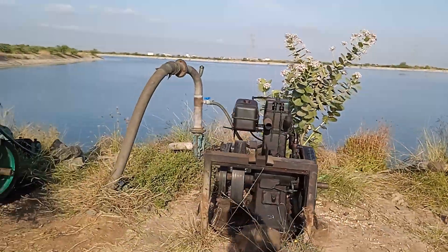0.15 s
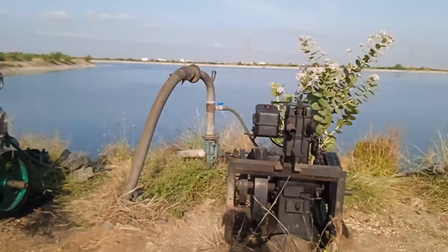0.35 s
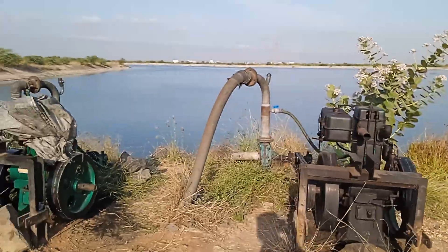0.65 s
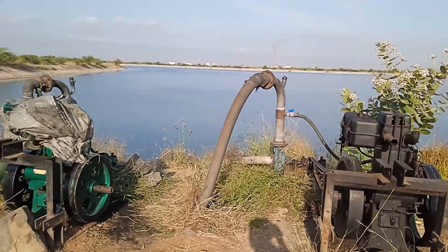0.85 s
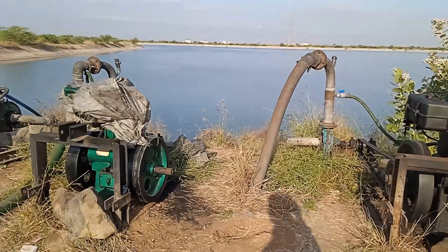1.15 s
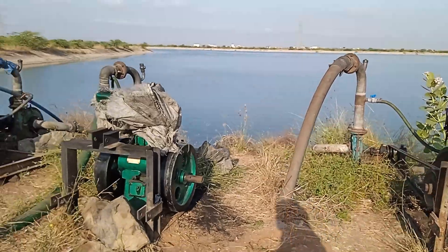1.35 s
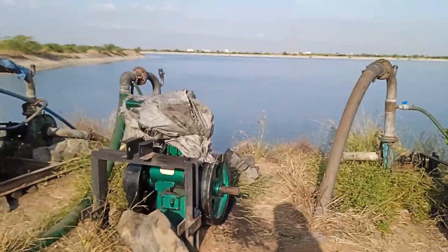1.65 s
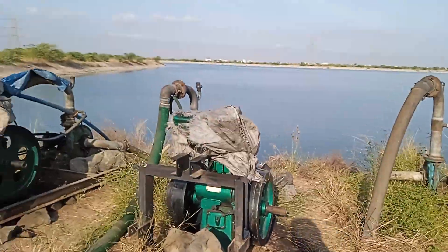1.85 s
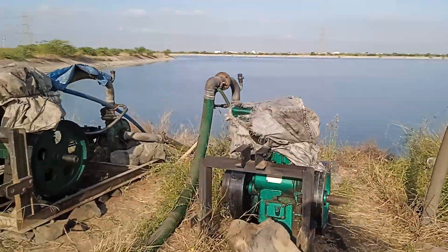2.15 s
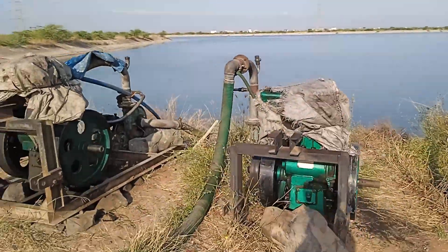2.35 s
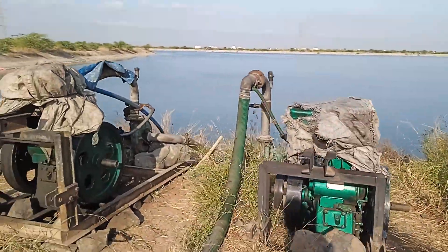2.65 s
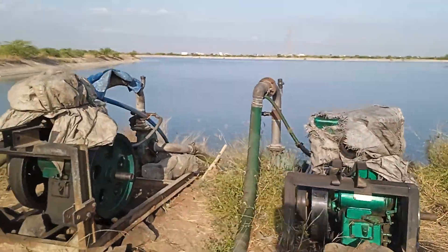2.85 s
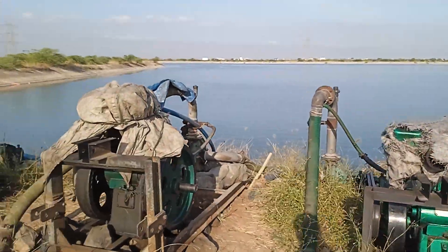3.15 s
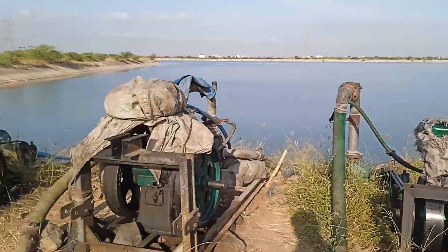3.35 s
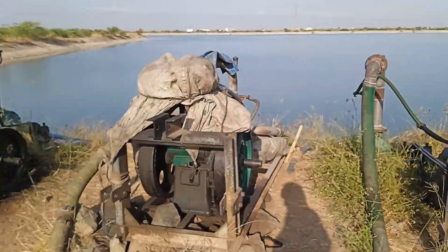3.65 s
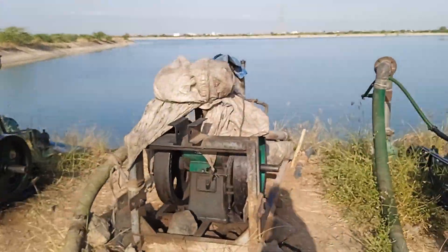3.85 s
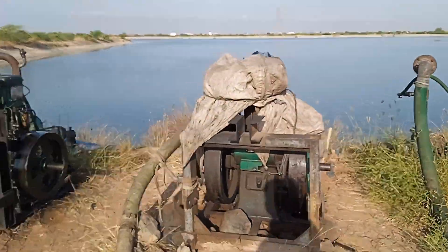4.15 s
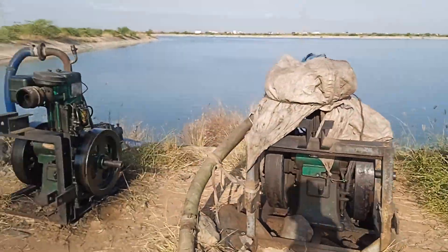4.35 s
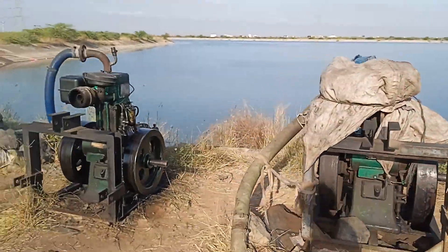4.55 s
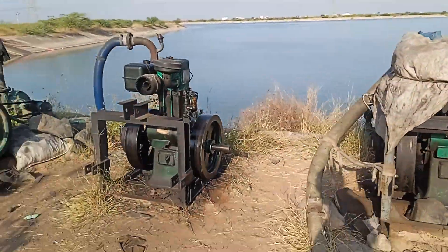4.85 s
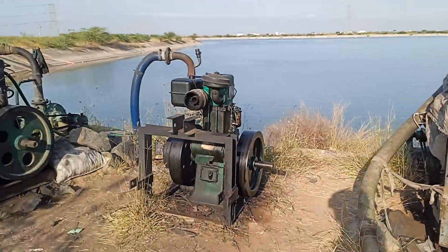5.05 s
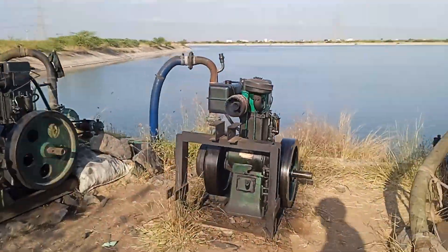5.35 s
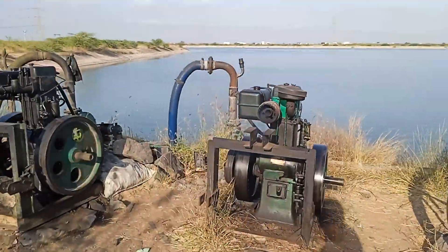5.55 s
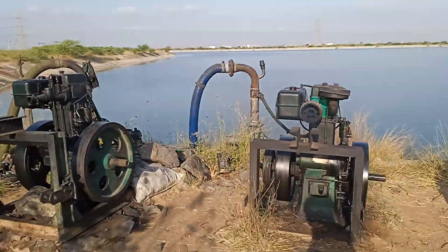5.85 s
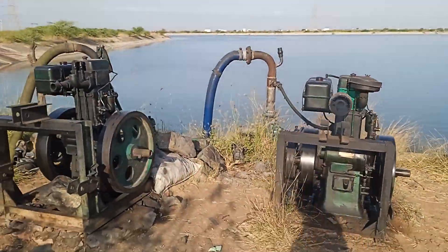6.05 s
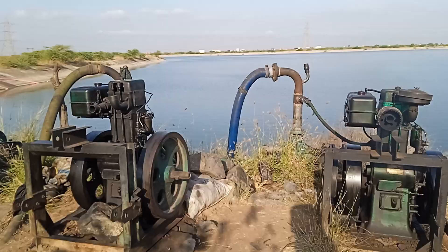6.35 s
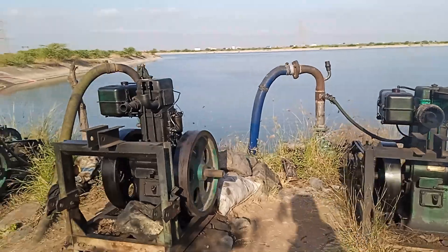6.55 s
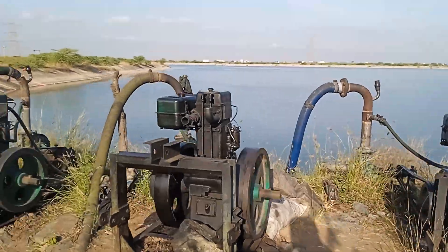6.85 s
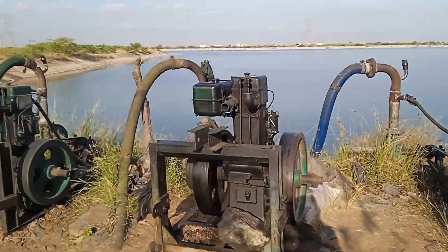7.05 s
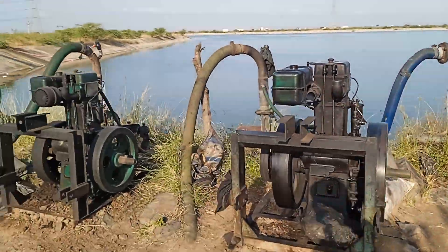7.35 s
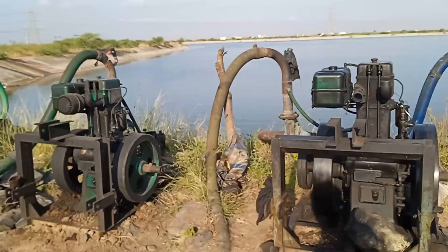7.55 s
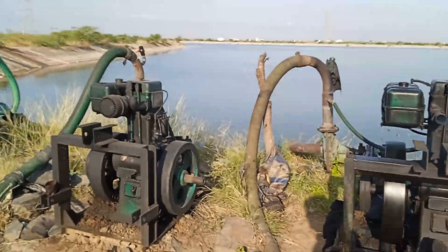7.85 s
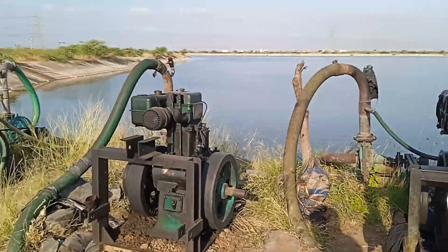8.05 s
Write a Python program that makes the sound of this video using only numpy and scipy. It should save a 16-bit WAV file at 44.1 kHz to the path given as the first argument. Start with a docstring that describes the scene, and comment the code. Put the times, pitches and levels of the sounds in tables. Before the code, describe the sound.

From 0 s three slow single-cylinder diesels are already running, at about 4.3, 3.5 and 3.8 firings a second, their beats drifting together and apart into an uneven gallop. The quickest gives bright, hissing gas barks with a short rising low boom; the slowest has a hollow bark and hard iron knock, its knocking clearer after about 4 s; the third starts more distant, a sharp pop followed by gas. Pipe thumps, intake gulps and small metallic ticks fill in. Carried along the row outdoors, the close microphone changes the balance: the fast engine's hiss is fullest around 5 s, the slow one's knock and the third's pop around 6 to 7 s. A soft low bump falls at 6.3 s. After 7 s the fast bark weakens while the hollow one stays strong. Rumble, frame drone, gear clatter and churning pumps continue behind, with water rush strongest at the end, around 8 s, engines still running.

```python
"""Three slow single-cylinder diesels drive pumps on a canal bank. They run from the start, each at its own speed,
so their beats drift through one another. Each firing thumps in the pipe as a burst of gas barks and hisses;
the fast and slow engines add a rising silencer boom, an intake gulp and a combustion knock, and valves tick.
The microphone is carried along the row, so each part changes level in turn, and at 6.3 s there is a soft low bump.
Gears, frames and pumped water sound behind it all, and the rush of water is strongest at the end."""
import sys
import numpy as np
from scipy import signal
from scipy.fft import rfft, irfft, next_fast_len
from scipy.io import wavfile

SR = 44100
rng = np.random.default_rng(int(sys.argv[2]) if len(sys.argv) > 2 else 0)


def materialize(psi):
    """Save the field psi as 16-bit PCM at rate SR to the path in sys.argv[1].

    A 1-D psi becomes a single channel; in a 2-D psi each row is a channel.
    """
    bounded = np.clip(np.atleast_2d(psi).T, -1, 1)
    quanta = np.round(bounded * 32767).astype(np.int16)
    wavfile.write(sys.argv[1], SR, quanta)


N = 362061
TIME = np.arange(N) / SR

# colour of an iron block struck by combustion: f/Hz, level/dB
BLOCK_COLOUR = [(200, -25), (330, -15.5), (420, 4.5), (550, -6.5), (750, -9.5), (950, -3), (1130, 0),
                (1450, -6.5), (1800, -8), (2600, -27), (4000, -22), (6500, -16), (9000, -31), (13000, -46)]
# colour of the air gulped through an intake: f/Hz, level/dB
INTAKE_COLOUR = [(150, -20), (280, -4.5), (345, 9.5), (440, 0.5), (560, -19.5), (1000, -2.5), (1500, -12),
                 (2800, -16.5), (4400, -16), (7000, -18.5), (10000, -31), (15000, -51)]


def fast_engine():
    """About 4.3 firings a second, with a bright gas bark and a deep silencer boom."""
    # pace, one row: first firing t/s, cycle length/s, lengthening per cycle/s
    pace = (.0101, .23216, .0000936)
    # rows: gas hiss, bark, pipe thump, silencer boom, intake, combustion knock, sizzle
    # columns: far level/dB, close level/dB, closest t/s, half-length of the pass/s, scatter between firings/dB
    parts = [(-29, -14, 5.14, 4.04, 1.9), (-21.5, -22.5, 4.3, -1.5, 0), (-34.5, -18, 5.86, 4.3, .9),
             (-28.5, -32.5, 3.5, 4.5, 1.0), (-44.5, -29.5, 6.2, 4.36, 2.7), (-42, -35.5, 6.5, 2.2, 1.5),
             (-27, -57, 3.1, 1.7, 1)]
    # bark of the can and hiss of the jet: f/Hz, level at the start of the row/dB, level at its end/dB
    bark_colour = [(390, -5.5, -20), (630, -3.5, -8), (930, -29, -11.5), (983, 1, -3.5), (1090, 0.5, 4),
                   (1360, -2, -1.5), (1750, -5, 0), (1770, -1, -3.5), (1930, 1, -10), (2320, -9, -53),
                   (2730, -3.5, 7.5), (3200, -16.5, -5)]
    hiss_colour = [(2360, -9, -17), (3070, -48, -4.5), (3510, -17, -12), (4044, 6.5, -12), (4340, 3, 7),
                   (4900, 3, -8.5), (5940, 2, -5), (5950, 2, 4), (7420, 5.5, -7.5), (9030, 1.5, -22.5),
                   (10700, -12.5, -14.5), (12000, -10, -35), (13300, -28, -30), (15300, -11, -21)]
    # the bark grows weaker late in the row as its colour turns: edge t/s, change before it/dB, change after it/dB
    bark_step = (6.9, 0, -8.5)
    # finest spray of the gas jet: f/Hz, level/dB
    sizzle_colour = [(8000, -10), (10000, 3), (12200, -6), (13500, -6), (15300, 0), (16500, -8)]

    s, hiss_db, bark_db, thump_db, boom_db, intake_db, knock_db, sizzle_db = run_engine(pace, parts)
    bark_db = bark_db + level_step(s, *bark_step)
    valve = puff(rise=0.0049, fall=0.004, tail_db=-19.0, tail_s=0.027, lead=0.00785)
    gas = exhaust(s, hiss_db, bark_db, bark_colour, hiss_colour, valve, rough_db=1.0)
    # the sizzle beams to the sides, so it is weakest close by
    spray = puff(rise=0.0086, fall=0.0037, tail_db=-20, tail_s=.01, lead=0.01)
    gas += cycles(s, sizzle_db, spray) * turbulence(sizzle_colour, rough_db=2.0)

    # the lower pipe mode is screened at the start of the row and opens up on the way
    screened_db = -10 * np.exp(-s / 6.4)
    pipe = cycles(s, thump_db + screened_db, ring(hz=402.4, rise=0.0074, decay=0.0036, lead=0.01153))
    pipe += cycles(s, thump_db - 6.5, ring(hz=517, rise=0.0035, decay=0.0049, lead=0.01081))
    # a third mode beams towards the end of the row, gaining 3 dB a second
    beam_db = -7.5 - 3 * (TIME[-1] - s)
    pipe += cycles(s, thump_db + beam_db, ring(hz=627, rise=0.0052, decay=0.0063, lead=.011))

    silencer = boom(start_hz=64, end_hz=187, glide_s=0.025, delay=0.00695, rise=0.009, decay=0.016)
    low = cycles(s, boom_db, silencer)
    gulp = puff(rise=0.013, fall=0.011, tail_db=-7.5, tail_s=0.045)
    intake = cycles(s + 0.075, intake_db, gulp) * turbulence(INTAKE_COLOUR, rough_db=0)
    # combustion comes before the exhaust valve opens
    blow = puff(rise=0.0024, fall=0.012, tail_db=-16, tail_s=0.019)
    knock = cycles(s - .052, knock_db, blow) * turbulence(BLOCK_COLOUR, rough_db=0)
    ticks = valve_gear(s - .052, hiss_db - 19.5, rise=0.0064, fall=0.0074)
    ticks += valve_gear(s + 0.122, hiss_db - 26, rise=0.004, fall=.004)
    return gas + pipe + low + intake + sheet_metal(knock + ticks, ring_db=-2.0, decay=0.012)


def slow_engine():
    """About 3.5 firings a second, with a hollow gas bark and a hard combustion knock."""
    # pace, one row: first firing t/s, cycle length/s, lengthening per cycle/s
    pace = (.1077, .28829, .000078)
    # rows: gas hiss, bark, pipe thump, silencer boom, intake, combustion knock
    # columns: far level/dB, close level/dB, closest t/s, half-length of the pass/s, scatter between firings/dB
    parts = [(-23.5, -16, 6.5, 2.14, 0.47), (-21, -21.5, 7.9, 2.2, 1.3), (-37.5, -26, 7.3, 0.89, 0.73),
             (-37.2, -34.5, 5.0, 4, 0.78), (-50.5, -28, 6.25, 3.1, 1.6), (-27.5, -24, 6.5, 1.7, 1.14)]
    # bark of the can and hiss of the jet: f/Hz, level at the start of the row/dB, level at its end/dB
    bark_colour = [(389, -4, -31), (670, -30, 9.5), (920, -6, -14), (1022, -5, 20), (1216, -4.5, -24),
                   (1410, -9.5, 15.5), (1630, -23, -23), (1770, 2, 14.5), (2150, -8, -9), (2380, -8, 8.5),
                   (2570, -4.5, 6), (3310, -15, -8)]
    hiss_colour = [(2450, -37, -28), (3060, -5.5, -6), (3800, -9.5, -6.5), (3900, -14, -1.5), (4650, -6, 4),
                   (4600, -17, -3), (5560, 2.5, -6.5), (6160, 5, -12), (6870, 2.5, 1), (8850, -0.5, -12),
                   (10100, -15, -14), (12000, -17, -28), (13800, -21, -25), (15400, -15, -14)]
    # something screens the knock on the first stretch: edge t/s, change before it/dB, change after it/dB
    knock_step = (3.9, -7, 0)

    s, hiss_db, bark_db, thump_db, boom_db, intake_db, knock_db = run_engine(pace, parts)
    knock_db = knock_db + level_step(s, *knock_step)
    valve = puff(rise=0.0043, fall=0.0042, tail_db=-18.5, tail_s=0.025, lead=0.009)
    gas = exhaust(s, hiss_db, bark_db, bark_colour, hiss_colour, valve, rough_db=0.5)
    # the can's strongest mode clanks, favoured about halfway along the row
    facing_db = -1.5 * np.abs(s - 3.9)
    clank = puff(rise=0.0044, fall=0.008, tail_db=-10, tail_s=0.007)
    gas += cycles(s, bark_db + facing_db - 2.5, clank) * resonance(hz=1778, width_hz=640)

    pipe = cycles(s, thump_db, ring(hz=329, rise=0.0069, decay=0.0065, lead=0.01427))
    silencer = boom(start_hz=68.8, end_hz=173, glide_s=0.0414, delay=0.0076, rise=0.012, decay=0.021)
    low = cycles(s, boom_db, silencer)
    gulp = puff(rise=0.011, fall=0.0093, tail_db=-8.5, tail_s=0.086)
    intake = cycles(s + 0.0787, intake_db, gulp) * turbulence(INTAKE_COLOUR, rough_db=0)
    blow = puff(rise=0.00088, fall=0.014, tail_db=-3.5, tail_s=0.024)
    knock = cycles(s - .064, knock_db, blow) * turbulence(BLOCK_COLOUR, rough_db=0.5)
    # the blow of combustion leaves the block ringing
    knock += cycles(s - .064, knock_db - 8.5, ring(hz=1099, rise=0.00052, decay=0.015, lead=0.0011))
    ticks = valve_gear(s + 0.087, db=-43.5, rise=0.0023, fall=0.0042)
    ticks += valve_gear(s + 0.0575, db=-46.5, rise=0.0024, fall=0.0043)
    return gas + pipe + low + intake + sheet_metal(knock + ticks, ring_db=0, decay=0.0017)


def far_engine():
    """About 3.8 firings a second: a sharp pop from the pipe mouth, then the gas."""
    # pace, one row: first firing t/s, cycle length/s, lengthening per cycle/s (negative: it speeds up)
    pace = (.0556, .2645, -.00001)
    # rows: gas hiss, bark, pipe thump
    # columns: far level/dB, close level/dB, closest t/s, half-length of the pass/s, scatter between firings/dB
    parts = [(-40.5, -24, 7.5, 3.06, 2.3), (-33.5, -25, 6.87, 2, 1.4), (-27.5, -25.5, 6.1, 1.3, 1.6)]
    # bark of the can and hiss of the jet: f/Hz, level at the start of the row/dB, level at its end/dB
    bark_colour = [(400, -15, 2.5), (704, -32, -3.5), (870, -38, -1), (1100, 3, -2.5), (1470, 9, -4),
                   (2120, -13, 1.5), (2700, 5.5, -15), (3260, -28, -30)]
    hiss_colour = [(2400, -30, -20), (2950, 5, -18), (4030, -3, 0.5), (5030, -16, 0.5), (6600, -8, -1.5),
                   (7750, 11.5, 1.5), (7960, -11, -11), (9600, -4, -9.5), (13000, -20, -34),
                   (15300, -20, -20)]

    s, hiss_db, bark_db, thump_db = run_engine(pace, parts)
    valve = puff(rise=0.0092, fall=0.0035, tail_db=-11.5, tail_s=0.029, lead=0.008)
    gas = exhaust(s, hiss_db, bark_db, bark_colour, hiss_colour, valve, rough_db=3.0)
    pipe = cycles(s, thump_db, ring(hz=317.4, rise=0.00065, decay=0.0053, lead=0.01108))
    # the pop beams from the pipe mouth, so it grows faster than the bark as the engine comes near
    pop_db = 1.93 * bark_db + 27.0
    pop = cycles(s, pop_db, ring(hz=874, rise=0.00045, decay=0.0021, lead=0.01))
    # a small metal rattle rides on the valve train
    ticks = valve_gear(s + 0.117, hiss_db - 20.5, rise=0.0015, fall=0.0057)
    return gas + pipe + pop + ticks


def run_engine(pace, parts):
    """Firing times of an engine whose speed slowly drifts, then each part's level in dB at those firings."""
    first, cycle, lengthening = pace
    k = np.arange(int(TIME[-1] / cycle) + 1)
    s = first + cycle * k + .5 * lengthening * k ** 2
    levels = []
    for *sweep, scatter_db in parts:
        levels.append(pass_by(s, *sweep) + scatter_db * rng.standard_normal(len(s)))
    return s, *levels


def exhaust(s, hiss_db, bark_db, bark, hiss, envelope, rough_db):
    """Gas bursts from the open valve: the can barks, the jet hisses, thin steel rings and two echoes follow."""
    gas = cycles(s, hiss_db, envelope) * passing(hiss, rough_db)
    gas += cycles(s, bark_db, envelope) * passing(bark, rough_db)
    gas = sheet_metal(gas, ring_db=-8.5, decay=0.0069)
    gas = bounce(gas, lag_ms=1.298, share=0.58, drift=0.1425)
    return bounce(gas, lag_ms=2.3, share=0.35, drift=0.0846)


def valve_gear(times, db, rise, fall):
    """A short metallic rasp at one point of the cycle, a little louder or softer each time."""
    # colour of the valve gear: f/Hz, level/dB
    valve_colour = [(800, -27), (1800, 10.5), (3200, -3), (4500, 10), (6500, 6), (8000, 0.5), (11000, -18),
                    (15000, -30)]
    dbs = db + 2 * rng.standard_normal(len(times))
    rasp = puff(rise, fall, tail_db=-50, tail_s=0.01)
    return cycles(times, dbs, rasp) * turbulence(valve_colour, rough_db=0)


def puff(rise, fall, tail_db, tail_s, lead=0.032):
    """Envelope of a valve that cracks open lead s before its widest and shuts again, with a scattered tail."""
    def shape(t):
        opened = np.clip((t + lead) / .001, 0, 1)  # opens within 1 ms
        body = np.exp(-.5 * (t / np.where(t < 0, rise, fall)) ** 2)
        tail = (t > 0) * undb(tail_db) * np.exp(-np.abs(t) / tail_s)
        return opened * np.hypot(body, tail)
    return shape


def ring(hz, rise, decay, lead):
    """A resonance fed by a pulse that begins lead s before the event; its pitch varies by 2 % between events."""
    def shape(t):
        age = np.maximum(t + lead, 0)
        swell = (1 - np.exp(-(age / rise) ** 2)) * np.exp(-(age - rise) / decay)
        pitch = hz * (1 + .02 * rng.standard_normal())
        return 2 * swell * np.sin(2 * np.pi * pitch * age)
    return shape


def boom(start_hz, end_hz, glide_s, delay, rise, decay):
    """The silencer's low note, which climbs as the piston shrinks the gas volume behind it."""
    def shape(t):
        age = np.maximum(t - delay, 0)
        glide = end_hz + (start_hz - end_hz) * np.exp(-age / glide_s)
        hz = glide * (1 + 0.046 * rng.standard_normal())  # each firing is tuned a little differently
        swell = (1 - np.exp(-(age / rise) ** 2)) * np.exp(-(age - rise) / decay)
        return -2 * swell * np.sin(2 * np.pi * np.cumsum(hz * (age > 0)) / SR)
    return shape


def cycles(times, dbs, shape):
    """Play shape(seconds from the event) once at each of the times."""
    out = np.zeros(N)
    for s, db in zip(times, dbs):
        start = max(int(s * SR) - SR // 20, 0)
        stop = max(int(s * SR) + SR // 7, 0)
        near = slice(start, stop)
        out[near] += undb(db) * shape(TIME[near] - s)
    return out


def pass_by(s, far_db, near_db, closest_s, half_s):
    """Level in dB at times s of something that the microphone is carried past: a bell curve in time."""
    nearness = np.exp(-.5 * ((s - closest_s) / half_s) ** 2)
    return far_db + (near_db - far_db) * nearness


def level_step(s, edge_s, before_db, after_db):
    """Step in level in dB at times s: a smooth change from before_db to after_db around edge_s."""
    edge_width_s = .08
    crossed = .5 * (1 + np.tanh((s - edge_s) / edge_width_s))
    return before_db + (after_db - before_db) * crossed


def passing(points, rough_db):
    """Sputtering gas whose colour turns from its first to its last shade as the microphone passes the pipe mouth."""
    hz, first_db, last_db = np.transpose(points)
    source = rng.standard_normal(N) * undb(rough_db * walk(1500))
    way = TIME / TIME[-1]
    first = colour(source, np.c_[hz, first_db])
    last = colour(source, np.c_[hz, last_db])
    return unit((1 - way) * first + way * last)


def bounce(x, lag_ms, share, drift):
    """Reflection off ground or frame; its lag drifts as the microphone is carried along."""
    lag = lag_ms / 1000 * np.exp(drift * walk(1))
    echo = np.interp(TIME - lag, TIME, x)
    return (x + share * echo) / np.hypot(1, share)


def sheet_metal(x, ring_db, decay, count=7):
    """Dense close modes of thin steel; their mix changes from one of count listening spots to the next."""
    t = TIME[:SR // 20]
    place = TIME / TIME[-1] * (count - 1)
    rung = np.zeros(N)
    for spot in range(count):
        # a fading burst of noise stands for many modes ringing at once
        tail = rng.standard_normal(len(t)) * np.exp(-t / decay)
        tail = tail / np.sqrt(np.sum(tail ** 2))
        nearness = np.sqrt(np.maximum(1 - np.abs(place - spot), 0))
        rung += nearness * signal.oaconvolve(x, tail)[:N]
    return (x + undb(ring_db) * rung) / np.hypot(1, undb(ring_db))


def machinery():
    """Frames rumble and drone, pumps churn, gears clatter, water rushes: coloured noises that waver in level."""
    # rows: rumble, frame drone, pump churn, gear clatter, water hiss
    # columns: far level/dB, close level/dB, closest t/s, half-length of the pass/s
    parts = [(-48, -44.5, 6.7, 1.9), (-55, -46.5, 5.77, 1.95), (-54.5, -43, 7.34, 2.8),
             (-44.5, -44, 3.8, 0.55), (-48.5, -42, 8.2, 1.2)]
    # colours of the five sounds, in the same order: f/Hz, level/dB
    rumble_colour = [(20, -34), (40, -36), (65, -3.5), (110, -3.5), (150, -3), (190, 0.5), (250, -4),
                     (400, -23)]
    drone_colour = [(180, -24), (270, -9), (310, -30), (335, 12), (380, -9), (435, 8), (490, -6),
                    (620, -6.5), (900, -10)]
    pump_colour = [(450, -39), (620, 2), (780, -5.5), (900, -6.5), (1150, -10.5)]
    gear_colour = [(800, -7.5), (1100, -0.5), (1500, 1.5), (1900, 2.5), (2400, -3), (3000, -15),
                   (4000, -25)]
    water_colour = [(2000, -16), (2900, 5.5), (3600, 0.5), (4500, -6), (5400, -1.5), (6700, 4.5),
                    (8000, -8), (10000, -10), (13500, -25), (15300, -9.5), (17000, -30)]

    rumble_db, drone_db, pumps_db, gears_db, water_db = (pass_by(TIME, *sweep) for sweep in parts)
    rumble = undb(rumble_db + 3.05 * walk(20)) * turbulence(rumble_colour, rough_db=2)
    drone = undb(drone_db + 4.4 * walk(25)) * turbulence(drone_colour, rough_db=5)
    pumps = undb(pumps_db + 3.2 * walk(30)) * turbulence(pump_colour, rough_db=2.0, rate=420)
    gears = undb(gears_db + 3.3 * walk(40)) * turbulence(gear_colour, rough_db=3.0, rate=500)
    water = undb(water_db + 0.98 * walk(46)) * turbulence(water_colour, rough_db=5.5, rate=540)
    # two narrow frame notes follow the slow swell of the drone
    frames = undb(drone_db - 1.5) * resonance(hz=331.0, width_hz=22)
    frames += undb(drone_db + .6) * resonance(hz=440.5, width_hz=40)
    return rumble + drone + frames + sheet_metal(pumps + gears + water, ring_db=-3.5, decay=0.004)


def turbulence(points, rough_db, rate=1500):
    """Coloured noise that sputters in quick random spurts; with rough_db 0 it flows evenly."""
    return colour(rng.standard_normal(N) * undb(rough_db * walk(rate)), points)


def resonance(hz, width_hz):
    """A narrow mode shaken by many small blows: noise through the same peak filter twice; rms 1."""
    b, a = signal.iirpeak(hz, hz / width_hz, fs=SR)
    once = signal.lfilter(b, a, rng.standard_normal(N))
    return unit(signal.lfilter(b, a, once))


def bump():
    """One soft low bump near the microphone: a short ring at about 105 Hz."""
    return cycles([6.274], [-27], ring(hz=105, rise=0.0016, decay=0.017, lead=0))


def colour(x, points):
    """Shape x by a spectrum of (f/Hz, level/dB) points; rms 1."""
    hz, db = np.transpose(points)
    size = next_fast_len(N)
    bins = np.maximum(np.arange(size // 2 + 1) * SR / size, 1)
    gain_db = np.interp(np.log(bins), np.log(hz), db)
    # beyond the outer points the level falls by 30 dB per octave
    octaves_outside = np.maximum(np.log2(hz[0] / bins), 0) + np.maximum(np.log2(bins / hz[-1]), 0)
    gain_db = gain_db - 30 * octaves_outside
    return unit(irfft(rfft(x, size) * undb(gain_db), size)[:N])


def walk(rate):
    """Random levels, rate a second, joined by straight lines; rms 1."""
    return unit(np.interp(TIME * rate, np.arange(N // 8), rng.standard_normal(N // 8)))


def undb(db):
    """Decibels to gain."""
    return 10 ** (np.asarray(db) / 20)


def unit(x):
    """Scale to rms 1."""
    return x / np.sqrt(np.mean(x ** 2))


def scene():
    """The three engines, the machinery behind them and the bump, as one channel."""
    return (fast_engine() + slow_engine() + far_engine() + machinery() + bump())[None]


def record(dry):
    """The microphone sheds the deepest bass; the recorder rounds the highest peaks and cuts the top."""
    ceiling, top_hz = .55, 15900  # ceiling as a share of full scale
    highpass = signal.butter(1, 30, "highpass", fs=SR, output="sos")
    lowpass = signal.ellip(10, .2, 70, top_hz, fs=SR, output="sos")
    dry = signal.sosfilt(highpass, dry)
    rounded = ceiling * np.tanh(dry / ceiling)
    return signal.sosfilt(lowpass, rounded)


dry = scene()
out = record(dry)
materialize(out)
```